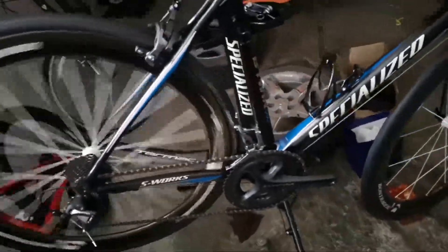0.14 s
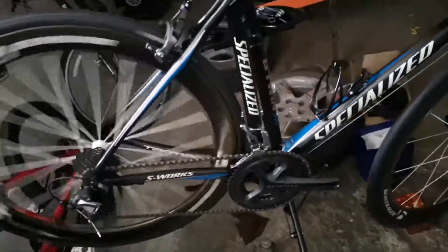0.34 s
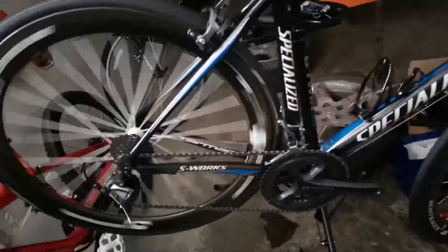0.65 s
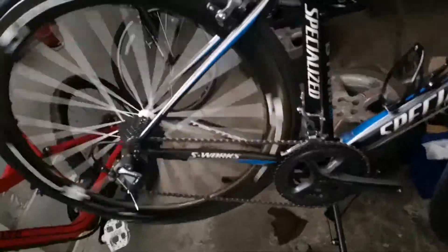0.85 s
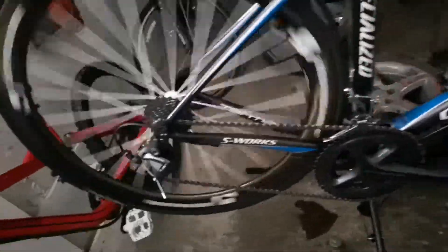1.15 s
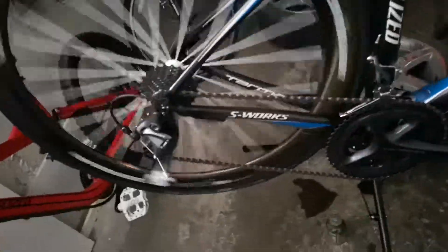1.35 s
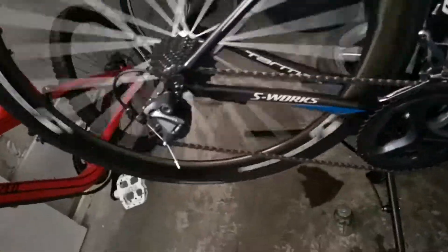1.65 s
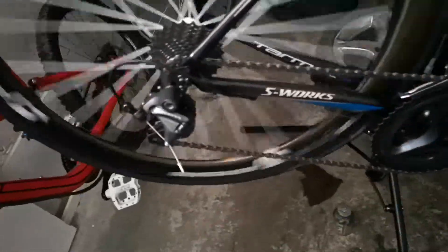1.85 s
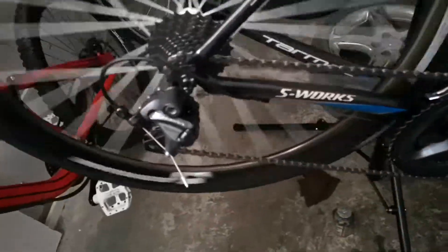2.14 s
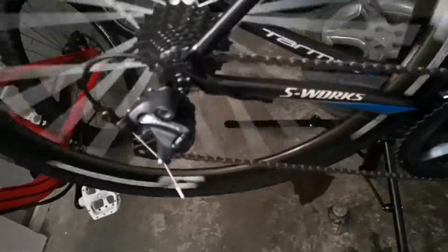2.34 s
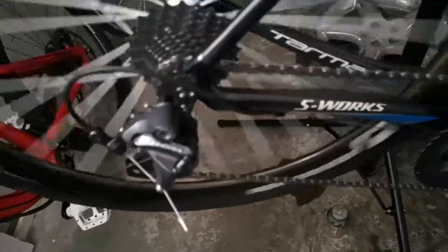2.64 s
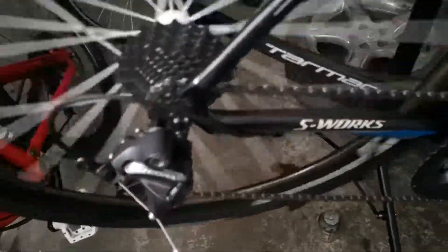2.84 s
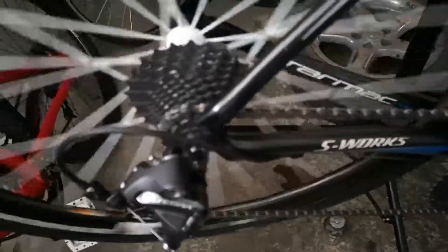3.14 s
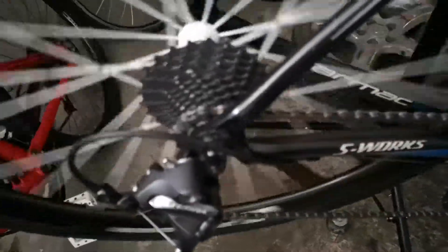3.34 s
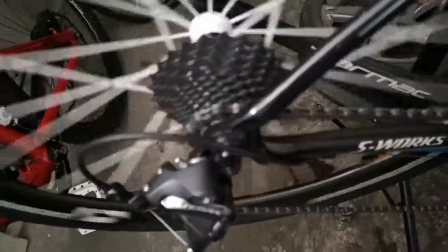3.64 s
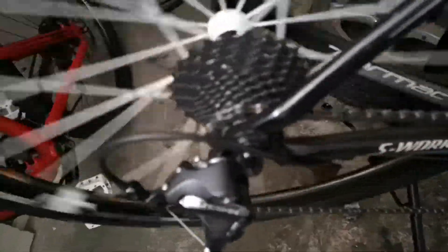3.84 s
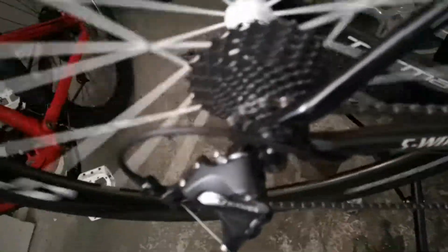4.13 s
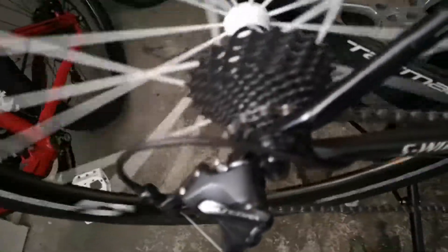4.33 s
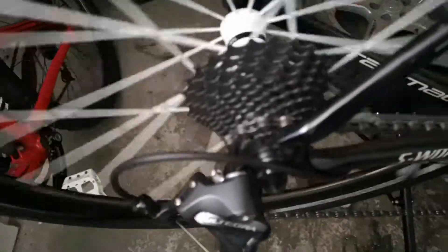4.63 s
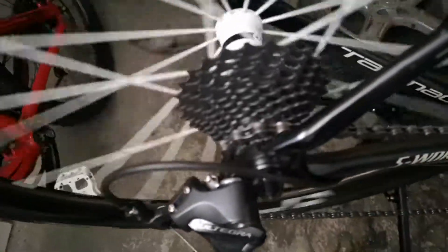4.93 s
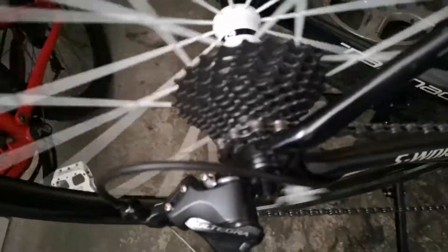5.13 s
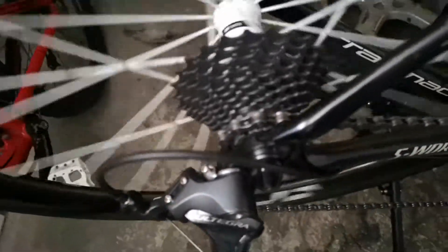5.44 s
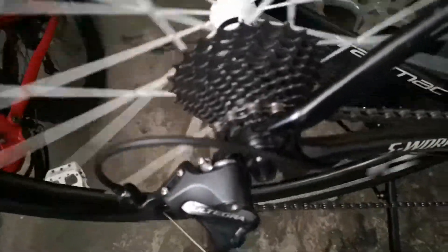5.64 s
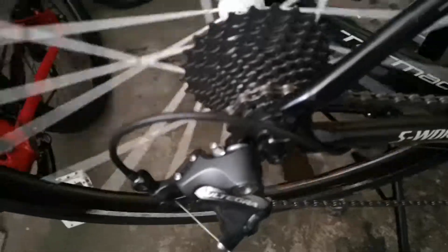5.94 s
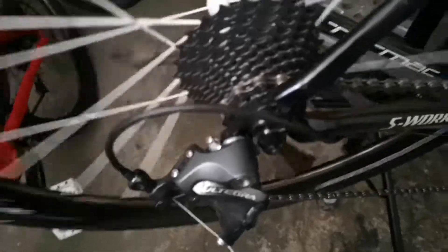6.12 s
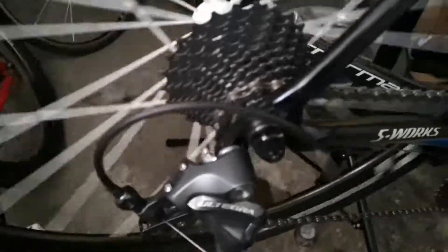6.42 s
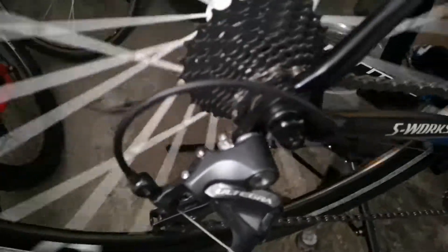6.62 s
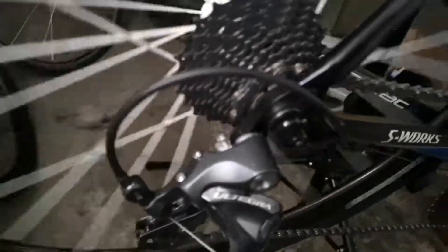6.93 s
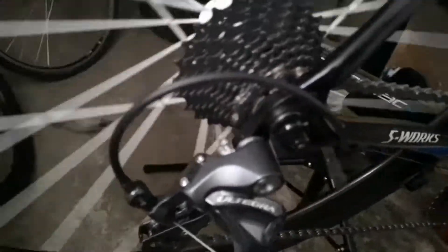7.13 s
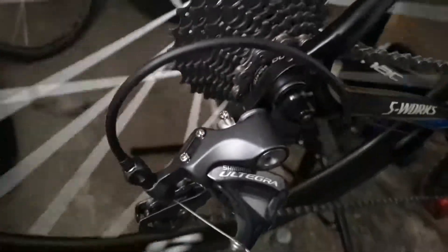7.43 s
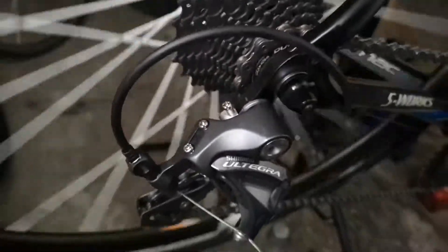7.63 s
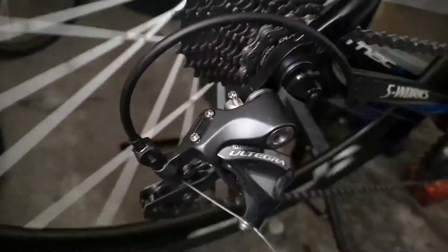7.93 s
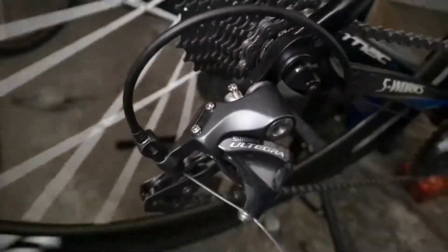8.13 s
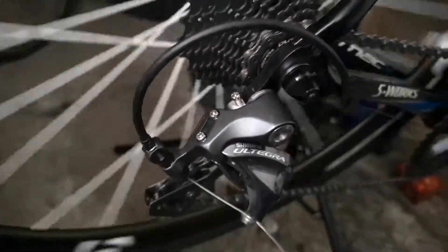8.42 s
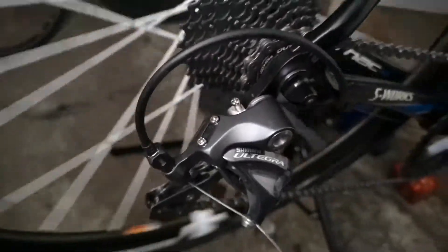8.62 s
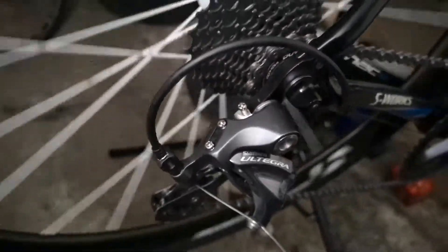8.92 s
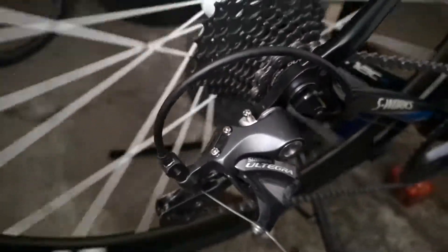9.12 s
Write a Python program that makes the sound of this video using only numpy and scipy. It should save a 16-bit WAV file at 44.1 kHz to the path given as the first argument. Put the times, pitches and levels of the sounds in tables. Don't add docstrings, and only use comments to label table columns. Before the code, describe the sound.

Fast, crisp ratchet ticking runs throughout, roughly thirty-five clicks a second at first and noticeably slower by the end. Each click is a hard metallic snap with a short ringing of spokes and rim, uneven in strength around each turn. The place is a small echoing garage; the handheld stereo microphone comes close. A dull bump near four seconds and faint later scuffs sit over quiet rumble and hum.

```python
import sys
import numpy as np
from scipy import signal
from scipy.io import wavfile
from scipy.ndimage import uniform_filter1d

SR = 44100
rng = np.random.default_rng(int(sys.argv[2]) if len(sys.argv) > 2 else 0)


def amp(db):
    return 10 ** (np.asarray(db, float) / 20)


def write(x):
    x = np.atleast_2d(x).T
    wavfile.write(sys.argv[1], SR, np.round(np.clip(x, -1, 1) * 32767).astype(np.int16))


N = 408793

TEETH, SNAP_COUNT = 18, 237
# t/s, garage echo level/dB, left-right level/dB, right lag/ms
PLACE = [(0, -2, 1.5, 0.24), (1.5, -4.5, 2, 0.27), (3, -10, 1.5, 0.35), (4.5, -11.5, 0.5, 0.63),
         (6, -11.5, 1.5, .55), (7.5, -10, 2, 0.62), (9.3, -11, 0, 0.67)]
# t/s, mean blow level/dB, nearness 0-1, view of the frame level/dB
REACH = [(0, -40, 0.44, 4.5), (.9, -39, 0.53, -2.5), (1.8, -37, 0.4, 2.5), (2.7, -34, 0.23, 1.5),
         (3.6, -32.5, 0.45, 5), (4.5, -30.5, 0.5, 0.5), (5.4, -30, 0.78, -2.5), (6.3, -32, 0.64, 0),
         (7.2, -31.5, 0.72, 0), (8.2, -31.5, 0.92, -5), (9.3, -31.5, 0.8, -6)]


def evened(x):
    return x / np.sqrt(np.mean(x ** 2) + 1e-20)


def read(points, hz, column=1):
    rows = np.array(points, float)
    return np.interp(np.log(hz + 1), np.log(rows[:, 0] + 1), rows[:, column])


def add(mix, s, sound):
    part = mix[..., max(round(s * SR), 0):][..., :sound.shape[-1]]
    part += sound[..., :part.shape[-1]]


def ratchet(count=700, rise_ms=0.99):
    # f/Hz, level/dB
    wheel_modes = [(700, -37), (1000, -24.5), (1400, -31.5), (1800, -9.5), (2300, 3.5), (3500, -3.5),
                   (4150, -1), (5300, -2), (5900, -11.5), (7100, -10.5), (7780, 0.5), (8350, -5),
                   (10300, -11), (14900, -14.5), (15400, -25), (16000, -46)]
    # f/Hz, t60 of the crack/s, t60 of the ring/s, ring level/dB
    wheel_decay = [(870, 0.027, 0.51, -3), (1920, 0.029, 0.75, -17.5), (4760, 0.05, 0.16, -14.5),
                   (7730, 0.06, 0.083, -16), (11220, 0.014, 0.11, -29)]
    # f/Hz, level/dB, t60/s
    rim_modes = [(585, -40, 0.21), (952, -27, 0.041), (1022, -25, 0.046), (1196, -42.5, 0.61),
                 (1510, -27, 0.18), (1552, -30, 0.27), (1695, -34, 0.08), (1892.6, -17, 0.33),
                 (1918, -17.5, 0.2), (1989.4, -16.5, 0.23)]
    # f/Hz, left-right level/dB
    mic_lean = [(500, -0.5), (1200, -3), (2400, -2.5), (4400, 0.5), (8000, 0), (13000, -7.5)]

    t = np.arange(5500, dtype=np.float32) / SR
    hz = np.geomspace(650, 16000, count) * rng.uniform(1.0, 1.003, count)
    crack, ring, ring_db = (np.float32(read(wheel_decay, hz, column=k)[:, None]) for k in (1, 2, 3))
    fall = -3 * np.log(np.float32(10)) * t
    body = np.exp(fall / crack) + amp(ring_db) * np.exp(fall / ring)
    body *= np.sin(np.float32(2 * np.pi * (hz[:, None] * t + rng.random((count, 1)))))
    body *= (amp(read(wheel_modes, hz)) * np.sqrt(hz / 4000))[:, None]
    rim_hz, rim_level, rim_t60 = np.float32(rim_modes).T[..., None]
    long_ring = 8.0 * amp(rim_level) * np.exp(fall / rim_t60) * np.sin(2 * np.pi * rim_hz * t)
    modes = np.vstack([body, long_ring])
    modes *= 1 - np.exp(-(t * 1000 / rise_ms) ** 2)
    modes *= np.cos(np.pi / 2 * t / t[-1])

    pitch = np.append(hz, rim_hz)
    weight = radiation(pitch, by_tooth=0.72, neighbour=0.2, shared=0.071, spots_db=2.5, steady_hz=1280)
    s = snap_times()
    blow_db, rim_db, hub_db, frame_db = blows(s)
    frame = 1 / (1 + (pitch / 1350) ** 8)
    rim = 1 / (1 + (pitch / 3200) ** 8)
    hub = 1 / (1 + (6400 / pitch) ** 8)
    facing_db = np.outer(frame_db, frame) + np.outer(rim_db - 0.5, rim - frame)
    facing_db += np.outer(hub_db + 5.0, hub) + beams(pitch, s)
    facing_db = facing_db[:, None] + np.outer([0.5, -0.5], read(mic_lean, pitch))
    sounds = np.float32(weight * amp(facing_db)) @ np.float32(modes)
    onset_rms = np.sqrt((sounds[..., :450] ** 2).mean((1, 2)))
    sounds *= (amp(blow_db) / onset_rms)[:, None, None]

    bounce_delay = (.003, 0.022)
    gaps = rng.uniform(*bounce_delay, SNAP_COUNT)
    bounce_db = -14.5 + 3 * rng.standard_normal(SNAP_COUNT)
    when, _, pan_db, lag_ms = np.transpose(PLACE)
    out = np.zeros((2, N))
    for start, pair, gap, db in zip(s, sounds, gaps, bounce_db):
        pair = pair.copy()
        add(pair, gap, amp(db) * np.diff(pair[:, :1500]) * np.linspace(1, 0, 1499) ** 2)
        pan = np.interp(start, when, pan_db) / 2
        lag = np.interp(start, when, lag_ms) / 2000
        add(out[0], start - lag, amp(pan) * pair[0])
        add(out[1], start + lag, amp(-pan) * pair[1])
    add(out, 0, out[:, 2530:3800])
    return out


def snap_times():
    coast = (-.0954, 35.3106, -1.18192, .0134069)
    wobble = (.00033, .00023)
    t, tooth = np.linspace(0, 9.5, 9501), np.arange(SNAP_COUNT)
    angle = 2 * np.pi * tooth / TEETH
    late = wobble[0] * (np.cos(angle) - np.sin(angle))
    late += wobble[1] * (tooth / 100) ** 2 * np.sin(angle)
    return np.interp(tooth, np.polyval(coast[::-1], t), t) + late


def blows(s):
    # blow level/dB, rim share/dB, hub share/dB, frame share/dB
    turn_far = [(0, 5, -4, -11), (-2, 5.5, -0.5, -4), (-1.5, -7.5, -8, 3.5), (-2.0, -13, -12.5, 2),
                (0.8, -3, -8, 3), (2.5, -3.5, -10.5, -1.5), (-0.5, 0, -9.5, 2), (0.7, -1, -10.5, 0),
                (2.5, 2, -9.5, 0.5), (2.5, -3, -10.5, -7.5), (3, 2, -9, 1.5), (4.5, -4, -14, -11),
                (1.5, -2, -11, -1.5), (3.9, -1.5, -9.5, 0), (0.2, -9, -11, -3), (-0.1, -3, -12, -6),
                (3, 1.5, -5.5, 1), (-0.2, 1.5, -9, -3)]
    turn_near = [(-5, 0.7, -6, 8.5), (-4.5, -1.3, -11, 1), (-3.5, -2, -9, -4.5), (1, 10, -6.5, -2),
                 (-0.9, 1.8, -7, 6), (1.7, -0.3, -8.5, 0.5), (4, 1.3, -7.5, -7), (5.5, 2.2, -8.5, -3.5),
                 (3.5, 4.7, -4, -3.5), (1.6, 1.3, -8, 0.5), (-1.8, -1.1, -2.5, 7), (-0.5, 2, -0.5, 7.5),
                 (0.2, -1, -10.5, 3.5), (-2.1, -2.5, -5.5, 5.5), (-0.3, 7, -2.7, 9.5), (0.54, 2.1, -6, 0),
                 (-1.55, 4, -6.5, -7.5), (-3, -1.8, -3.5, 6.5)]
    when, mean_db, near, view_db = np.transpose(REACH)
    near = np.clip(np.interp(s, when, near), 0, 1)[:, None]
    tooth = np.arange(SNAP_COUNT) % TEETH
    rows = (1 - near) * np.array(turn_far)[tooth] + near * np.array(turn_near)[tooth]
    scatter_db = np.array([0.58, 0.46, 0.46, 0.46])
    blow_db, rim_db, hub_db, frame_db = (rows + rng.standard_normal(rows.shape) * scatter_db).T
    return blow_db + np.interp(s, when, mean_db), rim_db, hub_db, frame_db + np.interp(s, when, view_db)


def beams(pitch, s):
    # f/Hz, lobes a turn, loudest tooth, swing level/dB
    lobed_modes = [(587, 1, 15.1, 3), (1225, 1, 16, 6), (1617, 2, 5.3, 10.5), (1560, 1, 19, 0.5),
                   (1700, 2, 8.7, -1), (2068, 2, 4.4, 2.5)]
    # t/s, f/Hz, level/dB, length/s
    glints = [(1.352, 3840, 3, 0.34), (3.043, 4840, 2.5, 0.26), (3.98, 1970, 10, 0.13),
              (4.39, 2430, 7, 0.15), (5.1, 8150, -1.5, 0.27), (5.694, 4300, 1.5, 0.23),
              (5.86, 4160, 10.5, .12), (5.89, 8300, 1.5, 0.41), (6.653, 7950, 5, 0.29),
              (6.65, 4160, 5.5, 0.23), (6.695, 2240, 10, .12), (7.353, 8100, 4, 0.76),
              (7.585, 2200, 7, .15), (8.4, 4160, 4, 0.47), (9.2, 4200, 0, 0.27)]
    glint_width = 0.065
    tooth = np.arange(SNAP_COUNT)[:, None]
    swell = np.zeros((SNAP_COUNT, len(pitch)))
    for hz, lobes, at, db in lobed_modes:
        turning = np.cos(2 * np.pi * round(lobes) * (tooth - at) / TEETH)
        swell += db * turning * (abs(pitch / hz - 1) < 0.04)
    for at, hz, db, length in glints:
        moment = (2 * (s[:, None] - at) / length) ** 2
        swell += db * np.exp(-moment - ((pitch / hz - 1) / glint_width) ** 2)
    return swell


def radiation(hz, by_tooth, neighbour, shared, spots_db, steady_hz):
    snaps, count = SNAP_COUNT, len(hz)
    chance = rng.standard_normal((snaps, 2, count))
    tooth = rng.standard_normal((TEETH, 2, count))[np.arange(snaps) % TEETH]
    w = by_tooth * tooth + np.sqrt(max(1 - by_tooth ** 2, 0)) * chance
    w = w + neighbour * np.roll(w, 1, axis=0)
    w = w + shared * w[:, ::-1]
    spots = uniform_filter1d(rng.standard_normal((snaps, 1, count)), size=40, axis=2)
    spots = evened(uniform_filter1d(spots, size=3, axis=0))
    w = evened(w) * amp(spots_db * np.linspace(0.4, 1.3, snaps)[:, None, None] * spots)
    angle = 2 * np.pi * (np.arange(snaps)[:, None, None] / TEETH + rng.random((2, count)))
    steady = rng.choice([-1., 1.], (1, count)) * (0.92 + 0.54 * np.cos(angle))
    share = 1 / (1 + (hz / steady_hz) ** 6)
    return np.sqrt(share) * steady + np.sqrt(1 - share) * w


def stand():
    # f/Hz, level/dB, t60/s, right lag/rad
    stand_modes = [(146, -76, 0.25, .6), (158.5, -71.5, 0.28, 0.46), (296.2, -73, 0.12, 1.4),
                   (230, -78, .1, 2.6)]
    # f/Hz, level re blow/dB, t60/s, right lag/rad
    tube_modes = [(976, -23, 0.059, 0.38), (821, -26.5, .05, 2.1)]
    when, mean_db, _, view_db = np.transpose(REACH)
    mean_db, view_db = (np.interp(snap_times(), when, db) for db in (mean_db, view_db))
    swing_db = 2.5 * np.cos(2 * np.pi * (np.arange(SNAP_COUNT) - 8.9) / TEETH)
    shake_db = 7.5 + 0.6 * (mean_db + 32) + 1.47 * rng.standard_normal(SNAP_COUNT)
    knock_db = mean_db + 0.5 * view_db + swing_db
    return rung(stand_modes, shake_db, rise_s=0.0045) + rung(tube_modes, knock_db, rise_s=0.0027)


def rung(modes, level_db, rise_s):
    t, train = np.arange(SR // 3) / SR, np.zeros(N + SR)
    train[np.round(np.maximum(snap_times(), 0) * SR).astype(int)] = amp(level_db)
    pair = np.zeros((2, len(t)))
    for hz, db, t60, lag in modes:
        pair += amp(db - 60 * t / t60) * np.sin(2 * np.pi * hz * t - np.array([[0], [lag]]))
    return signal.oaconvolve(train[None], pair * np.minimum(t / rise_s, 1), axes=1)[:, :N]


def garage(x):
    # f/Hz, t60/s
    echo_decay = [(500, 0.6), (2000, 0.34), (8000, 0.35), (15000, 0.14)]
    taps = np.zeros((2, SR // 2))
    at = np.arange(200, SR // 2 - 20, 20)
    places = at + rng.integers(0, 20, (2, len(at)))
    np.put_along_axis(taps, places, rng.choice([-1., 1.], (2, len(at))), 1)
    hz, t, z = signal.stft(taps, SR, nperseg=256)
    tail = signal.istft(z * amp(-60 * t / read(echo_decay, hz)[:, None]), SR, nperseg=256)[1]
    echo_db = np.interp(np.arange(N) / SR, *np.transpose(PLACE)[:2])
    return signal.fftconvolve(x * amp(echo_db), tail / np.linalg.norm(tail[0]), axes=1)[:, :N]


def handling():
    # t/s, peak level/dB, swing f/Hz, t60/s, first direction
    bumps = [(3.755, -51, 12, 0.34, 1), (3.781, -32.5, 38, 0.057, -1), (3.809, -40, 44, 0.079, 1),
             (3.962, -24.5, 97, 0.05, -1), (3.987, -42, 27, 0.11, -1), (6.044, -56, 60, .04, 1),
             (6.144, -45, 24, 0.12, -1), (6.9859, -39.5, 170, 0.0067, -1), (6.989, -40, 33, 0.038, 1),
             (7.711, -47, 104, 0.046, 1), (7.721, -45, 123, 0.11, -1), (8.417, -46.5, 61, 0.07, 1),
             (8.472, -44, 45, 0.065, -1)]
    # t/s, level/dB, length/s, top f/Hz
    scuffs = [
        (0.106, -67, 0.57, 420),
        (6.04, -57.5, 0.15, 326),
        (7.701, -56, 0.14, 298),
        (7.836, -61, 0.14, 302),
        (8.362, -62.5, 0.37, 336),
        (8.949, -59, 0.33, 258),
    ]
    out = np.zeros((2, N))
    t = np.arange(SR // 2) / SR
    for s, db, hz, t60, direction in bumps:
        swing = np.sin(2 * np.pi * hz * t) * amp(-60 * t / t60) * (1 - np.exp(-(t / 0.001) ** 2))
        add(out, s, np.outer([1.07, 0.93], np.sign(direction) * amp(db) * swing / abs(swing).max()))
    for s, db, length, top_hz in scuffs:
        a, b, lumps = rng.standard_normal((3, len(t)))
        band = signal.butter(3, [40, top_hz], "band", fs=SR, output="sos")
        rub = signal.sosfilt(band, [a + 0.61 * b, a - 0.4 * b])
        lumps_db = 1.23 * evened(uniform_filter1d(lumps, size=600))
        shape = np.minimum(t / 0.011, 1) * amp(-20 * (t / length) ** 2 + lumps_db)
        add(out, s, amp(db) * evened(rub) * shape)
    return out


def background():
    # t/s, swell level/dB, length/s
    grips = [(0.105, 7, .2), (.65, 4.5, 0.61), (1.75, 2, .2), (2.15, 11, 0.072), (2.597, 4, 0.14),
             (4.4, 9, 0.18), (3.79, 16, 0.16), (4.097, 7, 0.32), (4.723, 11, 0.15), (5.497, 9.5, 0.53),
             (6.1, 7, 0.4), (7.1, 5, 1), (8.51, 2, 0.44), (9.25, 4, .2)]
    # f/Hz, width/Hz, level/dB
    hum_lines = [(153, 31, 0.5), (166.3, 15, -7)]
    # f/Hz, level per Hz/dB
    air_colour = [(30, -9), (60, 12), (110, 4.5), (200, 0.5), (307, -6), (450, -9), (700, -38), (1500, -45)]
    # f/Hz, level per Hz/dB
    hiss_colour = [(300, -4.5), (1500, 11), (6000, -5), (10500, -3.5), (15000, 9), (15400, -12),
                   (16400, -35)]
    t = np.arange(N) / SR
    grip_db = sum(db * np.exp(-(2 * (t - s) / length) ** 2) for s, db, length in grips)
    hum_db = -75 + 4 * wander(top_hz=8.5)
    rumble_db = -59 + 2.1 * wander(top_hz=3.1) + grip_db
    rumble_colour = [(10, 8.0), (28, -5.0), (50, -19), (90, -35), (200, -56)]
    out = amp(rumble_db) * noise(rumble_colour, patchy_db=3.5)
    for hz, width, db in hum_lines:
        r = np.exp(-np.pi * width / SR)
        flutter = rng.standard_normal((2, N)) + 1j * rng.standard_normal((2, N))
        slow = signal.lfilter([1], [1, -r], flutter)
        slow = slow[0] + 0.12 * slow[1] * np.array([[1], [-1]])
        out += amp(db + hum_db) * evened((slow * np.exp(2j * np.pi * hz * t)).real)
    out += amp(-69.5) * noise(air_colour, patchy_db=4.0)
    return out + amp(-63) * noise(hiss_colour, patchy_db=3.0)


def wander(top_hz, count=24):
    t = np.arange(0, N + 512, 256) / SR
    hz = np.geomspace(0.2, top_hz, count)[:, None]
    slow = (np.sin(2 * np.pi * (hz * t + rng.random((count, 1)))) / np.sqrt(hz)).sum(0)
    return np.interp(np.arange(N) / SR, t, evened(slow))


def noise(spectrum, patchy_db):
    # f/Hz, left-right likeness 0-1
    likeness = [(30, 0.99), (70, 1), (140, 1), (290, 0.4), (640, 0.066)]
    frames, hz = N // 512 + 5, np.fft.rfftfreq(2048, 1 / SR)
    a, b, c, d, patches = rng.standard_normal((frames, 1025, 5)).T
    patches = uniform_filter1d(patches, size=5, axis=0)
    patches = evened(uniform_filter1d(patches, size=9, axis=1))
    same = np.clip(read(likeness, hz), -1, 1)[:, None]
    left = a + 1j * b
    z = np.array([left, same * left + np.sqrt(1 - same ** 2) * (c + 1j * d)])
    z *= amp(read(spectrum, hz)[:, None] + patchy_db * patches)
    return evened(signal.istft(z, nperseg=2048, noverlap=1536)[1][:, :N])


def scene():
    wheel = ratchet()
    return wheel + garage(wheel) + stand() + background() + handling()


def thin_treble(x, size=4, whim_db=8.5):
    # f/Hz, level under the overall level/dB
    dropout_floor = [(5000, -50), (7000, -35), (9500, -42.5), (11500, -34), (13000, -37), (15500, -37)]
    hz, _, z = signal.stft(x, SR, nperseg=256)
    power = (abs(z) ** 2).mean(0)
    bands = power[:-1].reshape(-1, size, power.shape[1]).sum(1)
    bands = uniform_filter1d(bands, size=3, axis=1)
    overall = uniform_filter1d(power.sum(0), size=151)
    overall = overall * (overall / overall.mean()) ** 0.5
    whim = evened(uniform_filter1d(rng.standard_normal(bands.shape), size=4, axis=1))
    floor_db = read(dropout_floor, hz[size // 2::size][:len(bands)])[:, None]
    limit = overall * amp(2 * (floor_db + whim_db * whim))
    keep = np.clip(12.0 * np.log(abs(bands) / limit + 1e-9) + 0.5, 0.01, 1)
    keep = np.repeat(keep, size, axis=0)
    keep = np.vstack([np.where(hz[:-1, None] < 4500, 1, keep), keep[-1:]])
    return signal.istft(z * keep, SR, nperseg=256)[1][:, :N]


def band_limit(x):
    return signal.sosfilt(signal.butter(12, 16470, fs=SR, output="sos"), x)


def record(dry):
    edge = signal.firwin(511, 16470, window=("kaiser", 9), fs=SR)
    mix = thin_treble(signal.oaconvolve(dry, edge[None], "same"))
    return band_limit(mix)


dry = scene()
out = record(dry)
write(out)
```